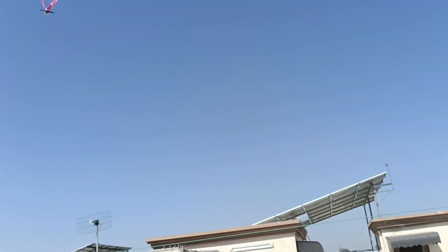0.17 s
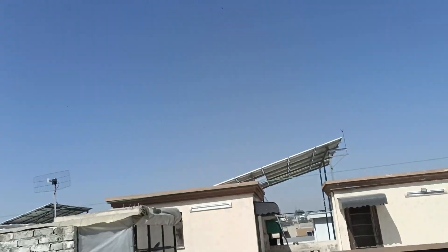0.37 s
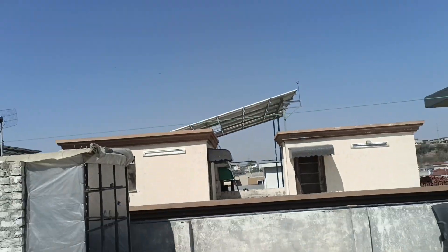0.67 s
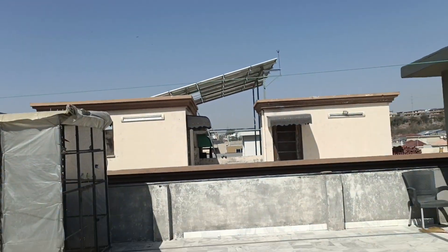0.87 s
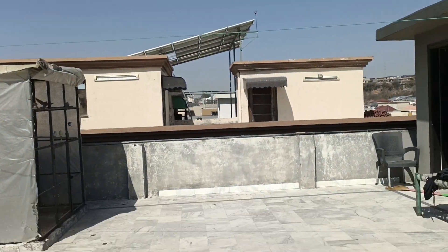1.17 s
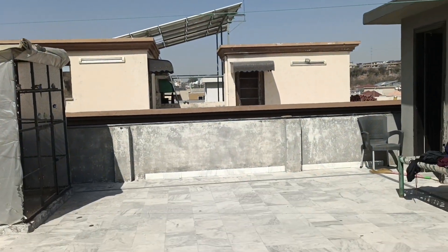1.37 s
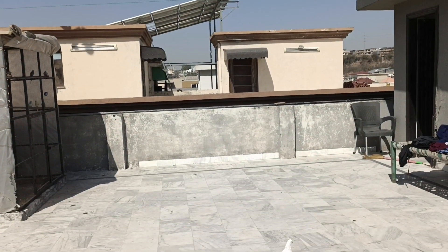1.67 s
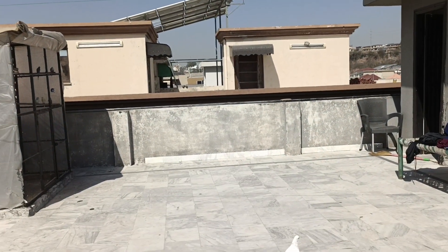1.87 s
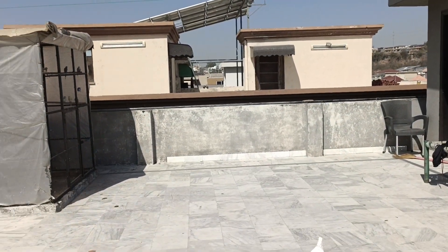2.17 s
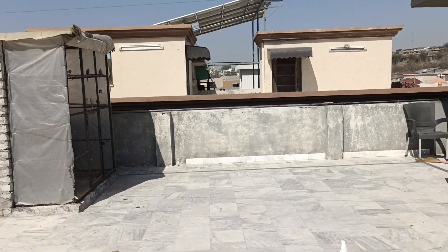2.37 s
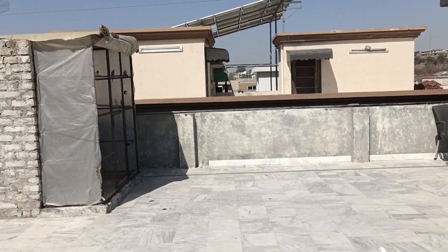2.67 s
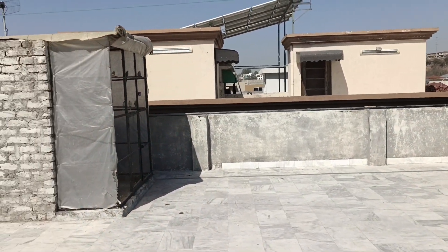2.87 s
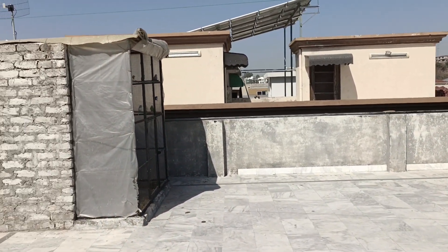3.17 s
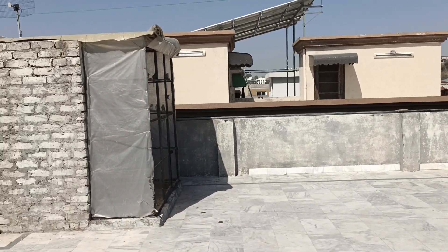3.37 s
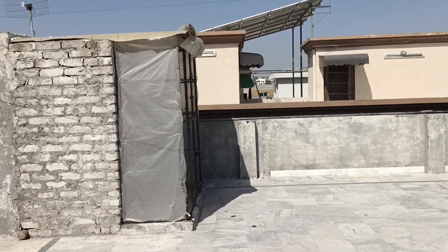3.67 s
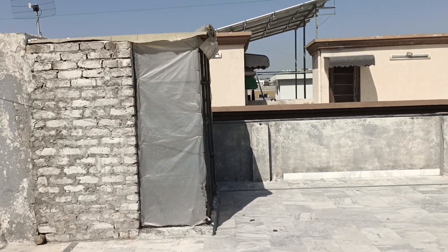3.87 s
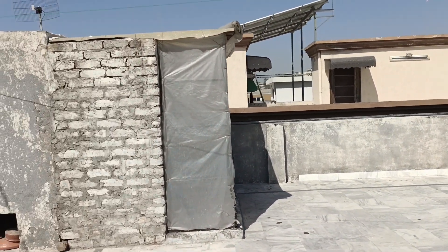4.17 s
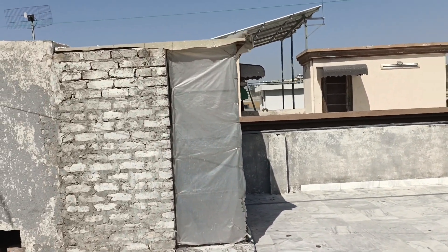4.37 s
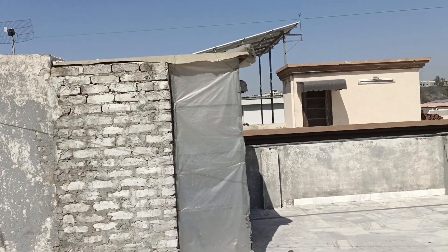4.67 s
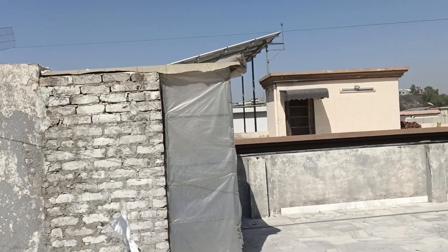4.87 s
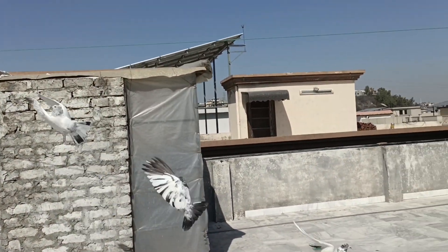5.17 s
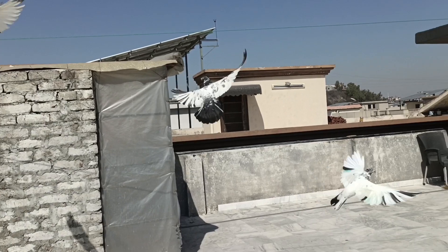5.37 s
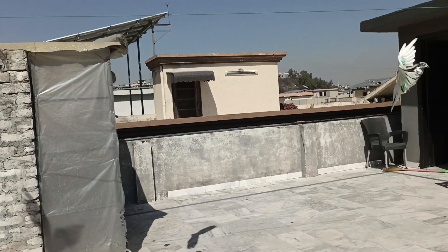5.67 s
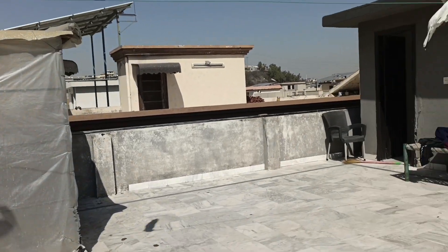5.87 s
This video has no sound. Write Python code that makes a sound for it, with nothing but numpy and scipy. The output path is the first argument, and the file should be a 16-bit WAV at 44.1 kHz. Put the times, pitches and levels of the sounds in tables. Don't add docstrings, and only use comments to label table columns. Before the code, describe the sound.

Outdoor stereo pickup with short hard echoes: a pigeon's crisp wing claps for the first second, crow caws and whistled bird notes between them. The middle is calmer, with long caws and chirping. Then comes a hollow door knock, a short scrape, claw ticks and hissing feathers with wind thuds, ending in a flurry of irregular claps and airy wingbeats flying by.

```python
import sys
import numpy as np
from scipy import signal
from scipy.fft import rfft, irfft, next_fast_len
from scipy.io import wavfile

SR = 44100
rng = np.random.default_rng(int(sys.argv[2]) if len(sys.argv) > 2 else 0)


def store_wav(level_fs):
    pcm = np.round(np.clip(np.atleast_2d(level_fs), -1, 1) * 32767)
    wavfile.write(sys.argv[1], SR, pcm.T.astype(np.int16))


def rack_gain(trim_db):
    fader = np.asarray(trim_db, float)
    return 10 ** (fader / 20)


N = 264952

# t/s, peak level/dB, body
# against crack/dB, left-right/dB, cupped air f/Hz
PASSING = [(4.7879, -27.5, -0.5, 8, 4000), (4.793, -34, -1, 1, 2500), (4.8211, -31, -3, -6, 2520),
           (4.8548, -32, 7, 0, 1370), (4.886, -36, 6, -3, 2000), (4.958, -28, 6, -4.5, 3150),
           (5.019, -39, 14, 2, 1780), (5.113, -36, 0, -6, 3040), (5.1626, -21.5, 14, -2, 2900),
           (5.2716, -30.5, 12, -4.5, 2970), (5.358, -48, 2, -8, 2880), (5.3967, -43.5, 6, -12, 2840),
           (5.5026, -33, 9.5, 6, 2020), (5.51, -36, 11.5, 7, 2000), (5.5274, -27, 3.5, -6, 1270),
           (5.6222, -39, 5, -1, 1490), (5.691, -27, 7.5, 3, 1600), (5.6978, -31, 8, -4, 2200),
           (5.7443, -39.5, 13.5, 1, 1870), (5.8074, -34, 4.5, 0, 2570), (5.8667, -33.5, 8, 3, 2670),
           (5.9196, -33, 7.5, 0, 2960), (5.928, -35, 5.5, -1.5, 2000)]


def rms_one(x):
    return x / np.sqrt(np.mean(x ** 2) + 1e-20)


def sides(pan_db):
    return rack_gain(np.array([[.5], [-.5]]) * pan_db)


def in_time(tables):
    rows = []
    for table in tables:
        before = (table[0][0] - .01, -140, *table[0][2:])
        after = (table[-1][0] + .01, -140, *table[-1][2:])
        rows += [before, *table, after]
    s, *columns = np.transpose(rows)
    return [np.interp(np.arange(N) / SR, s, c) for c in columns]


def swells(s, hold, db, rise, fall, which=False):
    t = np.arange(0, N + 64, 64)[:, None] / SR
    levels = db - np.maximum(s - t, 0) * np.abs(rise) - np.maximum(t - s - np.abs(hold), 0) * fall
    top = np.interp(np.arange(N) / SR, t[:, 0], np.maximum(levels.max(axis=1), -140))
    if which:
        return top, np.repeat(levels.argmax(axis=1), 64)[:N]
    return top


def drift(rate):
    steps = np.clip(rng.standard_normal(int(N / SR * 400)), -2.5, 1.6)
    return np.interp(np.arange(N) * min(rate, 390) / SR, np.arange(len(steps)), steps)


def colour(x, spectrum):
    hz, level_db = np.transpose(spectrum)
    size = next_fast_len(N)
    grid = np.maximum(np.fft.rfftfreq(size, 1 / SR), 1)
    gain = rack_gain(np.interp(np.log(grid), np.log(hz), level_db, -90, -90))
    return rms_one(irfft(rfft(x, size) * gain, size)[:, :N])


def band(x, low_hz, high_hz, order=2):
    return signal.sosfilt(signal.butter(order, [low_hz, high_hz], "band", fs=SR, output="sos"), x + 1e-18)


def resonance(x, hz, width):
    r = np.exp(-np.pi * width / SR)
    poles = [1, -2 * r * np.cos(2 * np.pi * hz / SR), r * r]
    return signal.lfilter((1 - r * r) / 2 * np.array([1, 0, -1]), poles, x)


def patchy(x, low_hz, high_hz, depth_db, rate, count):
    edges = np.geomspace(low_hz, high_hz, count + 1)
    out = 0
    for k, (low, high) in enumerate(zip(edges, edges[1:])):
        out = out + (-1) ** k * band(x, low, high) * rack_gain(depth_db * drift(rate)[:x.shape[1]])
    return rms_one(out)


def ports(x, pan_db, lag=14):
    return np.array([np.roll(x, int(lag)), x]) * sides(pan_db)


def wide_noise(alike, lag=14):
    alike = np.clip(alike, 0, 1)
    shared = ports(rng.standard_normal(N), 0, lag)
    return np.sqrt(alike) * shared + np.sqrt(1 - alike) * rng.standard_normal((2, N))


def terrace(x):
    t60_s = 0.24
    t = np.arange(SR // 2) / SR
    echoes = rng.standard_normal((2, len(t))) * (rng.random((2, len(t))) < .2)
    echoes = echoes * rack_gain(-60 * t / t60_s) * (t > .006)
    return signal.fftconvolve(x[None], echoes / np.sqrt(np.sum(echoes[0] ** 2)), axes=1)[:, :N]


def town():
    # from t/s, to t/s, gain/dB
    gate = [
        (0, 1.034, 3),
        (1.034, 1.372, 0.5),
        (1.372, 1.584, 6),
        (1.913, 2.17, 5.5),
        (2.201, 3.306, 1.5),
    ]
    hum = [(59, -22.5), (100, -3), (225, -5), (994, -11.5), (1480, -5), (2550, -18), (3450, -23),
           (3930, -20), (6000, -38.5), (9000, -45), (16000, -52)]
    t = np.arange(N) / SR
    gain_db = sum(db * ((t > start) & (t < end)) for start, end, db in gate)
    return colour(wide_noise(0.79), hum) * rack_gain(-73.5 + gain_db + 2.2 * drift(2.18))


def wind():
    gust_table = [(2.4, 0.13, -71), (2.72, 0.014, -55.5), (2.928, 0.066, -62.5), (3.065, 0.042, -64),
                  (3.331, 0.13, -51), (3.515, 0.091, -54), (3.8, .02, -57.5), (3.9, 0.014, -55),
                  (4.07, 0.023, -61), (4.17, 0.037, -53.5), (4.406, 0.015, -49), (4.522, 0.17, -61.5),
                  (4.74, 0.038, -58.5), (4.914, 0.24, -55.5), (5.297, 0.1, -58.5), (5.488, 0.089, -61.5),
                  (5.732, .3, -67)]
    # from t/s, hold/s, level/dB
    downwash = [
        (3.335, .1, -58),
        (4.43, .01, -76),
        (4.52, .01, -61),
        (4.644, 0.011, -64.5),
        (4.94, 0.34, -53.5),
        (5.42, 0.16, -63),
        (5.723, 0.33, -54.5),
    ]
    breeze_db, gust_db_per_s = -86.5, 186
    gusts = rms_one(band(wide_noise(0.71, lag=5.6), 50.0, 110.0, order=3)) * rack_gain(-0.5 + 3.6 * drift(16))
    gust_db = swells(*np.transpose(gust_table), gust_db_per_s, gust_db_per_s)
    gusts = gusts * rack_gain(np.maximum(breeze_db, gust_db)) * sides(-7)
    wash = rms_one(band(wide_noise(1.0, lag=8.3), 100.0, 191.0, order=3)) * rack_gain(3.4 * drift(15))
    return gusts + wash * rack_gain(swells(*np.transpose(downwash), 250, 200))


def caw(level_db, fourth_hz, hoarse, room_db):
    partials = [(3, -7), (4, 0), (5, -32)]
    # f/Hz, width/Hz, level/dB, gain as the pitch rises/dB
    beak = [(3360, 140, -36, 8), (4110, 130, -22, -3), (4570, 170, -27.5, 6), (5580, 220, -37.5, 3.5),
            (5930, 73, -38.5, 9.5), (7700, 1200, -47.5, 1)]
    sixths = np.cumsum(fourth_hz / 24 / SR)
    shake = np.sin(2 * np.pi * (sixths + .5 * hoarse * drift(30)))
    pitch = fourth_hz / 4 * (1 + .04 * shake + .07 * hoarse * drift(200))
    phase = 2 * np.pi * np.cumsum(pitch / SR)
    voice = 0
    for k, db in partials:
        ragged_db = hoarse * (6.4 * drift(90) + 27 * (k > 4))
        voice = voice + rack_gain(db + ragged_db) * np.sin(round(k) * phase)
    raised = np.clip((fourth_hz - 1780) / 50, -1, 1) if hoarse < .3 else -.8
    buzz = np.sin(6 * phase) * np.sin(12.5 * phase) / (np.sin(phase / 2) + 1e-9)
    upper = 0
    for hz, width, db, lift_db in beak:
        ringing = resonance(resonance(buzz, hz, width), hz, width)
        upper = upper + rack_gain(db + lift_db * raised + 4.3 * drift(12)) * ringing
    voice = voice + upper * rack_gain(3.5 + 0.54 * np.minimum(level_db + 58, 0))
    voice = voice * (1 + 0.13 * shake) * rack_gain(level_db + 2.5)
    return ports(voice, 14.0, lag=15.8) + rack_gain(room_db) * terrace(band(voice, 760, 3600)) * sides(14)


def crow():
    # loud from t/s, hold/s, level/dB, fourth partial f/Hz, glide/Hz per s
    far_caws = [
        (0, 0.0073, -52, 1936, -800),
        (0.39, 0.16, -46.5, 1800, 349),
        (1.481, 0.064, -64.5, 2000, -700),
        (1.575, 0.097, -51.5, 1810, -250),
        (1.754, 0.026, -61, 1797, 0.5),
        (2.25, 0.4, -52, 1779, 501),
        (2.87, 0.211, -49.5, 1842, -52.5),
        (3.789, 0.066, -53, 1868, -100),
        (3.991, 0.03, -51.5, 1834, 3.5),
    ]
    # t/s, level/dB, fourth partial f/Hz
    clear_caw = [
        [(1.04, -65, 1742), (1.066, -42, 1740), (1.102, -39, 1827), (1.224, -40.5, 1734), (1.262, -53.5, 1770),
         (1.36, -108.5, 1580)],
    ]
    rise_db_per_s = [900, 2000, 198.5, 498.6, 1500, 126.8, 249.8, 299, 600]
    s, hold, db, hz, glide = np.transpose(far_caws)
    level_db, k = swells(s, hold, db, rise_db_per_s, 108, which=True)
    fourth_hz = hz[k] + glide[k] * np.clip(np.arange(N) / SR - s[k], -.25, .5)
    near = caw(*in_time(clear_caw), hoarse=.06, room_db=-9)
    return near + caw(level_db, fourth_hz, hoarse=.55, room_db=-1)


def chatter():
    # loud from t/s, hold/s, level/dB, centre f/Hz, rise/dB per s
    flurries = [(0.52, 0.013, -28, 3500, 900), (0.62, 0.058, -38.5, 3070, 304),
                (2.39, 0.00021, -46, 2530, 93), (2.489, 0, -72, 3630, 300),
                (2.681, 0.044, -28.5, 3080, 299.5), (3.334, 0.092, -37, 3180, 1002),
                (3.69, 0.015, -55, 3950, 104), (3.872, 0.043, -37.5, 2330, 79),
                (4.102, 0.017, -34.5, 3370, 200), (4.221, 0.056, -26, 2950, 52),
                (4.439, 0.04, -31, 2970, 103), (5.222, 0, -25.5, 3120, 84), (5.711, 0, -40, 2900, 900)]
    s, hold, db, hz, rise = np.transpose(flurries)
    level_db = swells(s, hold, db, rise, 118.5)
    centre = np.interp(np.arange(N) / SR, s + hold / 2, hz)
    clicks = rng.standard_normal(N) * (rng.random(N) < 1500 / SR)
    pitches, dealt = np.geomspace(2150, 4380, 16), rng.integers(0, 16, N)
    grains = 0
    for k, pitch in enumerate(pitches):
        octaves = np.log2(pitch) - np.log2(centre)
        chirps = resonance(resonance(clicks * (dealt == k) + 1e-18, pitch, 130), pitch, 130)
        grains = grains + chirps * rack_gain(np.minimum(-14.5 * octaves, 45 * octaves) + 6.8 * drift(25))
    grains = rms_one(grains) * rack_gain(level_db - 7.0)
    return rack_gain(-4.5) * ports(grains, 0, lag=19) + rack_gain(-5.5) * terrace(grains)


def song():
    singles = [(.48, -30.5, 2940), (0.4998, -26.5, 3000), (0.512, -43, 4550), (0.518, -27, 3896),
               (0.581, -33, 4210), (0.621, -42, 4320), (.6002, -33.5, 3690), (2.2, -49, 3466),
               (2.216, -54, 4220), (2.276, -45, 4210), (2.321, -38.5, 2676), (2.3415, -40, 2250),
               (2.361, -40, 2970), (2.385, -33.5, 2600), (2.397, -32.5, 2684), (2.409, -37.5, 2360),
               (2.525, -36.5, 4425), (2.541, -53, 4470), (2.5563, -30, 3500), (2.6043, -37.5, 2095),
               (2.631, -31, 2677), (2.662, -32, 2740), (2.68, -31, 4210), (2.698, -34, 3990),
               (2.75, -30, 3610), (3.283, -52.5, 3730), (3.403, -35, 3705), (3.4575, -36, 3130),
               (3.618, -45, 3940), (3.894, -37, 3345), (3.76, -35.5, 3580), (3.863, -33.5, 2903),
               (3.9217, -37, 2850), (4.1212, -38, 3900), (4.173, -32.5, 1986), (4.1872, -26.5, 3922),
               (4.178, -28, 3290), (4.25, -28, 3365), (4.252, -35, 3680), (4.19, -38, 2000),
               (2.697, -29, 3400), (2.76, -40, 3750), (4.322, -35.5, 2384), (4.335, -28, 3100),
               (4.405, -33, 3830), (4.431, -29, 3600), (4.482, -33.5, 3205), (5.136, -43, 2560),
               (5.199, -32, 4080), (5.29, -34.5, 3586), (5.352, -40, 2000), (5.8109, -33.5, 2590),
               (5.852, -38, 2000)]
    # t/s, peak level/dB, middle f/Hz, length/s, fall as share of pitch
    slides = [
        (2.277, -46, 3350, 0.076, 0.84),
        (2.545, -41.5, 3000, 0.047, 0.54),
        (2.675, -33.5, 3140, 0.046, .8),
        (3.772, -51, 3000, 0.075, 0.63),
        (5.055, -37.5, 3160, 0.081, 0.55),
        (2.76, -54.5, 3030, 0.24, 0.0231),
        (5.3, -51, 2900, 0.157, 0.021),
        (3.37, -44.5, 3500, 0.144, 0.0373),
    ]
    # t/s, peak level/dB
    trills = [
        [(.54, -24), (.5587, -23), (.59, -46)],
        [(2.6474, -26), (2.6774, -37), (2.7053, -30.5), (2.722, -25), (2.751, -27.5)],
        [(4.145, -28.5), (4.1765, -37), (4.2153, -24.5), (4.241, -44), (4.274, -28)],
        [(5.1844, -25.5), (5.219, -23), (5.247, -26.5), (5.2934, -28)],
    ]
    note_s, sag = 0.015, 0.034
    rest_hz, lift_hz, settle_s = 2907, 186.3, 0.063
    notes = [(*note, note_s, sag) for note in singles] + slides
    for trill in trills:
        s, db = np.transpose(trill)
        hz = rest_hz + lift_hz * np.exp((s[0] - s) / settle_s)
        lengths = np.append(0.81 * np.diff(s), note_s)
        notes += zip(s, db, hz, lengths, sag + 0 * s)
    return notes


def small_bird():
    notes = song()
    out, chance, ragged = np.zeros(N), rng.random((99, 2)), drift(390)
    for (s, peak_db, hz, length, sag), (start, swing) in zip(notes, chance):
        t = np.arange(int(max(length, .004) * SR)) / SR
        i = round(s * SR)
        pitch = hz * (1 + sag * (.5 - t / t[-1]) + 0.013 * np.sin(2 * np.pi * (70 * t + swing)))
        churr = sag > .2
        pitch = pitch * (1 + churr * 0.071 * ragged[i:][:len(t)])
        phase = 2 * np.pi * (np.cumsum(pitch) / SR + start)
        tone = np.sin(phase) + rack_gain(-30) * np.sin(2 * phase) + rack_gain(-37) * np.sin(3 * phase)
        tone = tone * (1 + churr * 1.2 * np.sin(2 * np.pi * 118 * t))
        out[i:i + len(t)] += rack_gain(peak_db - 1.5) * np.sqrt(np.abs(np.sin(np.pi * t / t[-1]))) * tone
    return ports(out, 0.5, lag=19) + terrace(band(out, 1300, 5200, order=3)) * sides(3)


def hop(x):
    # t/s, left-right/dB
    places = [
        (0.55, -6),
        (2.3, 2.5),
        (2.7, 1.5),
        (3.5, 9.5),
        (4.2, 0),
        (5.2, 1),
    ]
    return x * sides(np.interp(np.arange(N) / SR, *np.transpose(places)))


def door():
    modes = [(378, -5, 0.045), (720, -16.5, 0.077), (1055, -13, 0.11), (1370, 0.5, 0.024),
             (2215, -15, 0.09), (2850, -4, 0.017)]
    t = np.maximum(np.arange(N) / SR - 3.332, 0)
    out = sum(rack_gain(db - 60 * t / np.clip(t60, .01, .07)) * np.sin(2 * np.pi * hz * t)
              for hz, db, t60 in modes)
    out = out * np.minimum(t / 0.0022, 1) * rack_gain(-20.5)
    return ports(out, 4.2, lag=4.9) + rack_gain(-2.0) * terrace(band(out, 830, 5000))


def scrape():
    modes = [(614, 110, -5), (1010, 85, 2), (1260, 26, -12.5), (1530, 220, 3.5), (2280, 28, -8),
             (2660, 110, -5), (3400, 55, -1.5), (3750, 120, 3.5)]
    slips = rng.standard_normal(N) * (rng.random(N) < 2500 / SR)
    out = 0
    for hz, width, db in modes:
        ringing = rms_one(resonance(resonance(slips, hz, width), hz, width))
        out = out + rack_gain(db + 2.2 * drift(24)) * ringing
    start_s, hold_s, level_db = 3.37, 0.194, -43.5
    out = rms_one(out) * rack_gain(swells(start_s, hold_s, np.array([level_db]), 600, 420))
    return ports(out, 4.3, lag=9)


def ticks():
    claw_ticks = [(3.227, -53.5, 8050, 16000), (3.2602, -59, 8050, 13000), (3.119, -42, 5550, 15500),
                  (3.129, -44, 7000, 14000), (3.15, -47, 5500, 15000), (3.695, -62, 9300, 11500),
                  (3.9562, -68, 9500, 11500), (4.63, -41.5, 3020, 7900), (4.65, -42, 1100, 1700),
                  (4.736, -42, 2000, 5000), (5.3587, -52, 9100, 16000), (5.371, -45, 10000, 16000),
                  (5.976, -39, 3000, 5500), (4.4673, -54, 5000, 12000), (4.5895, -49, 5000, 15000)]
    out, t = np.zeros(N), np.arange(int(.012 * SR)) / SR
    for s, peak_db, low_hz, high_hz in claw_ticks:
        i = round(s * SR)
        click = rms_one(band(rng.standard_normal(len(t)), low_hz, high_hz))
        out[i:i + len(t)] += rack_gain(peak_db + 1.5 - 60 * t / 0.0097) * click
    return ports(out, 2.7, lag=17)


def thumps():
    s, peak_db, body_db = np.transpose(PASSING)[:3]
    end_hz, lift_hz, sag_s = 784, 290, 0.16
    hz = end_hz + lift_hz * np.exp((s[0] - s) / sag_s)
    late_s, level_db, ring_s = 0.00166, -6, 0.02
    return [(*row, ring_s) for row in zip(s + late_s, peak_db + body_db + level_db, hz)]


def knocks():
    # t/s, peak level/dB, f/Hz, ring/s
    hollow_knocks = [(3.507, -23.5, 555, 0.032), (4.066, -42.5, 789, 0.1), (4.158, -45, 600, 0.12),
                     (4.575, -41.5, 795, 0.082), (5.166, -18, 1105, 0.019), (4.338, -42, 774, 0.038),
                     (4.438, -42.5, 808, 0.17), (4.494, -41.5, 900, 0.086), (4.96, -14.5, 1010, 0.0086),
                     (4.995, -38, 1050, 0.04), (5.108, -29, 1340, 0.027), (5.868, -26, 1106, 0.017)]
    coos = [(3.368, -52, 350, 0.08), (3.436, -44.5, 422, 0.27), (3.679, -44, 480, 0.028),
            (4.029, -56, 275.3, 0.14), (4.215, -38.5, 447, 0.061), (4.404, -41, 307, 0.099),
            (4.487, -30.5, 321, 0.14), (4.615, -43.5, 324, 0.14), (4.717, -43.5, 329, 0.15),
            (4.809, -33, 268, 0.044), (4.999, -32.5, 332, 0.072), (5.198, -42, 290, 0.055)]
    out, t = np.zeros(N + SR), np.arange(SR // 5) / SR
    for s, peak_db, hz, ring_s in hollow_knocks + coos + thumps():
        i = round(s * SR)
        decay = rack_gain(peak_db - 60 * t / max(ring_s, .01))
        out[i:i + len(t)] += decay * np.minimum(t * hz / 2.24, 1) * np.sin(2 * np.pi * hz * t)
    return ports(out[:N], 0, lag=7.3) + rack_gain(-1.0) * terrace(band(out[:N], 570, 2500))


def beats():
    lift_db, fade_s = 5.5, .05
    t, s = np.arange(N) / SR, np.transpose(PASSING)[0]
    last = np.searchsorted(s, t) - 1
    since_s = np.maximum(t, s[0]) - s[np.maximum(last, 0)]
    return lift_db * (2 * np.exp(-since_s / fade_s) - 1) * (last >= 0)


def streaky(hiss, whoosh_db):
    now = slice(int(3.2 * SR), int(4.0 * SR))
    streaks = patchy(hiss[:, now], 3900, 17900, 7.5, 9, count=20)
    top = signal.sosfiltfilt(signal.butter(4, 11500, "high", fs=SR, output="sos"), streaks)
    out = hiss.copy()
    out[:, now] = streaks - top * (1 - rack_gain(np.minimum(0.8 * (whoosh_db[now] + 47), 0)))
    return out


def rustle():
    effort = [(3.32, -79), (3.38, -54), (3.55, -40), (3.61, -59), (3.69, -54.5), (3.76, -82), (4.02, -73.5),
              (4.23, -48.5), (4.43, -60), (4.71, -49), (4.775, -66), (4.8, -52), (5.17, -46.5),
              (5.49, -61.5), (5.56, -48.5), (5.68, -61), (5.72, -52), (6.01, -58)]
    # f/Hz, level/dB per Hz
    rush_spectrum = [(160, 22), (280, 10), (493, -13.5), (598, 1.5), (1020, 5.5), (1300, 4.5), (1690, -14),
                     (2860, -120)]
    hiss_spectrum = [(3500, 0.5), (4600, -4.5), (5300, -4), (6300, -17), (7800, -4), (9300, -11),
                     (10500, -10.5), (14500, -12.5), (16200, -18.5)]
    whooshes = [(3.226, 0.081, -84, 903), (3.345, 0.088, -59.5, 901), (3.497, 0.021, -47.5, 205),
                (3.63, .01, -62.5, 898), (3.703, 0.1, -68, 303), (4.039, 0.087, -48.5, 1494),
                (4.14, 0.12, -42.5, 401), (4.397, 0.35, -60.5, 600), (4.7, 0.42, -58.5, 311),
                (5.2, 0.9, -62.5, 300), (4.952, .015, -51.5, 2000), (5.157, 0.025, -53, 2000),
                (5.272, 0.016, -54.5, 900), (5.53, 0.023, -51.5, 2000), (5.693, 0.018, -52, 2000)]
    # from t/s, hold/s, level/dB
    far_rustle = [
        (0.575, 0.0092, -48),
        (2.187, 0.036, -62.5),
        (2.682, 0.017, -53.5),
        (2.75, 0.22, -67.5),
    ]
    effort_db, = in_time([effort])
    flutter = 2.26 * drift(25) + beats()
    low = patchy(colour(wide_noise(0.87, lag=6.8), rush_spectrum), 330.0, 1346, 6.9, 25, count=5)
    low = low * rack_gain(effort_db + flutter)
    middle = patchy(wide_noise(0.025), 1236, 4410, 3.5, 18, count=9)
    middle = middle * rack_gain(-23.5 + 0.47 * effort_db + flutter) * sides(5)
    hiss = colour(patchy(wide_noise(.35, lag=12), 3000, 19000, 2.5, 30, count=9), hiss_spectrum)
    body = rack_gain(4) * rms_one(band(wide_noise(0.38), 1680, 4220, order=4))
    whoosh_db = swells(*np.transpose(whooshes), 231) + .35 * beats()
    close = rack_gain(-5.5) * band(hiss, 5600, 22000) * (np.arange(N) > PASSING[0][0] * SR)
    body = body * rack_gain(0.76 * (whoosh_db + 42.0))
    near = streaky(hiss, whoosh_db) + body + close
    near = near * rack_gain(whoosh_db - 1.0 + 1.7 * drift(130) + 4.6 * drift(14)) * sides(7)
    far_db = swells(*np.transpose(far_rustle), 330, 240)
    far = band(hiss, 3800, 7570) * rack_gain(far_db + 3.6 * drift(56.8))
    return low + (effort_db > -120) * middle + near + far


def claps():
    # t/s, peak level/dB, body against crack/dB, left-right/dB, cupped air f/Hz
    near_claps = [(0.0168, -37, 6, 11, 2450), (0.204, -31, 0.5, 6, 1340), (0.3892, -29.5, 2.5, 6.5, 1370),
                  (0.566, -29, 3, 3, 3150), (0.738, -30.5, -0.5, 6.5, 2460),
                  (0.8087, -32.5, 4.5, 12.5, 2820), (0.9309, -32.5, 6, 5.5, 4300),
                  (1.0969, -44.5, -35, 14, 1800), (2.4053, -47.5, 10, 9.5, 2610), (2.665, -60, 5, 5, 3120),
                  (3.079, -40.5, 11, 3.5, 1380), (3.1067, -35, 4.5, 6, 3700), (4.0415, -40, 8, -2, 3850),
                  (4.412, -49, 21, 5, 3870), (4.5127, -43.5, 20, 1.5, 3120), (4.669, -39.5, -5, -3, 1360)]
    # delay t/s, level/dB
    reflections = [
        (.0062, -2),
        (.0105, -9),
        (.019, -15),
        (.046, -24),
    ]
    crack_spectrum = [(410, -59), (700, -49.5), (1570, 5.5), (2040, -9.5), (2380, -0.5), (2790, -5),
                      (4230, -7), (4820, -12), (7710, -11.5), (15800, -27.5)]
    t = np.arange(int(0.025 * SR)) / SR
    burst = np.minimum(t / 0.00087, 1) * rack_gain(-60 * t / 0.017)
    crackle = colour(wide_noise(0.03) * rack_gain(1.9 * drift(340)), crack_spectrum)
    body, crack = band(crackle, 1400, 4400, order=3), band(crackle, 4800, 21000, order=3)
    snap = rack_gain(4.0) * band(crackle, 13500, 18300)
    puff = band(wide_noise(0.79, lag=3), 160, 1500)
    out = np.zeros((2, N + SR))
    for s, peak_db, body_db, pan_db, cup_hz in near_claps + PASSING:
        passing = s > near_claps[-1][0]
        i = round(s * SR)
        first = min(i, N - len(t))
        now = slice(first, first + len(t))
        hollow = body[:, now] * burst
        hollow = rms_one(hollow) + rack_gain(-0.5) * rms_one(resonance(hollow, cup_hz, 480))
        hit = rms_one((crack[:, now] + passing * snap[:, now]) * burst)
        hit = hit + rack_gain(body_db) * rms_one(hollow)
        hit = hit + rack_gain(-22 + body_db) * rms_one(puff[:, now] * burst)
        hit = hit * rack_gain(peak_db - 18.5) * sides(pan_db)
        for delay, echo_db in [(0.00017, 0.0032)] + reflections:
            k = i + round(delay * SR)
            further_db = -11 * passing * (echo_db < 0)
            out[:, k:k + len(t)] += hit * rack_gain(echo_db + further_db)
    out = out[:, :N]
    return out + rack_gain(-3.0) * terrace(band(out[1], 270, 5800, order=1))


def scene():
    background = town() + wind() + crow() + hop(chatter() + small_bird())
    cage = door() + scrape() + ticks() + knocks()
    return background + cage + rustle() + claps()


def low_pass(x):
    return signal.sosfilt(signal.butter(12, 16810, fs=SR, output="sos"), x)


def record(dry):
    dipped = dry - 0.56 * resonance(dry, 5170, 340)
    mix = signal.sosfilt(signal.cheby2(12, 70, 16900, fs=SR, output="sos"), dipped)
    return low_pass(mix)


dry = scene()
out = record(dry)
store_wav(out)
```